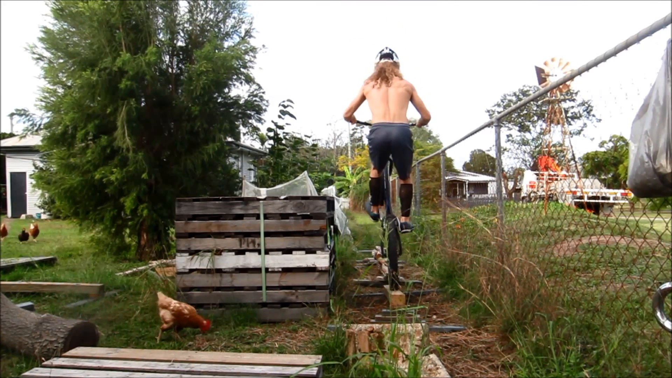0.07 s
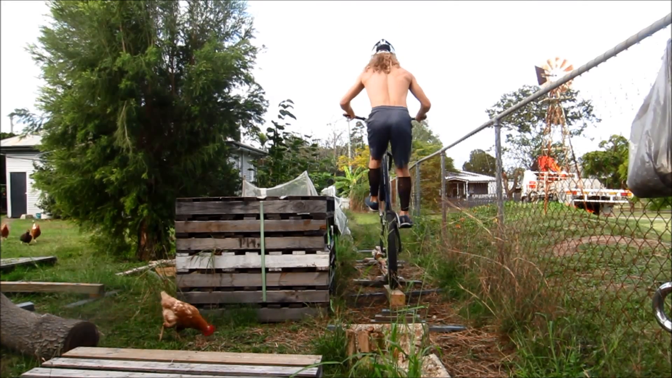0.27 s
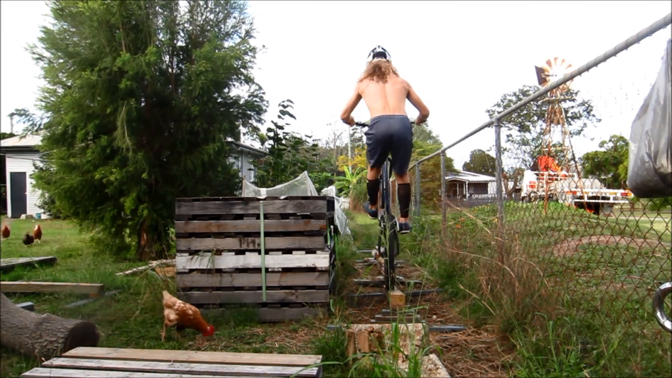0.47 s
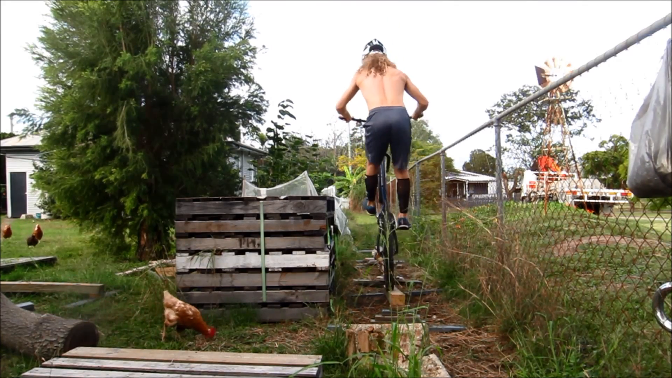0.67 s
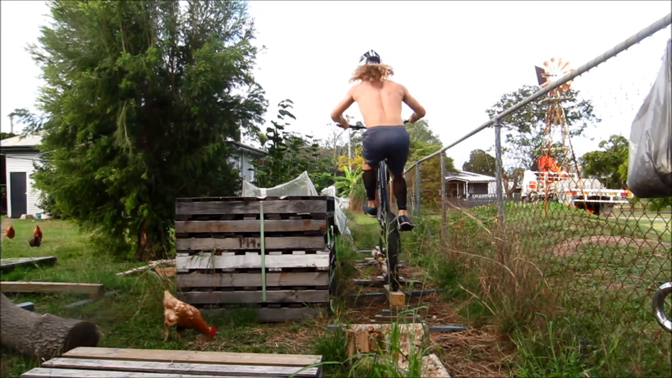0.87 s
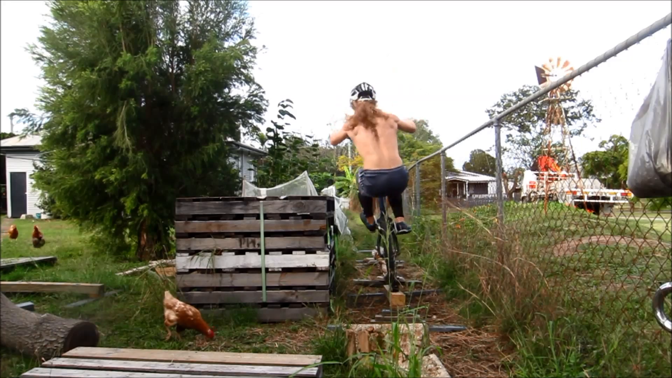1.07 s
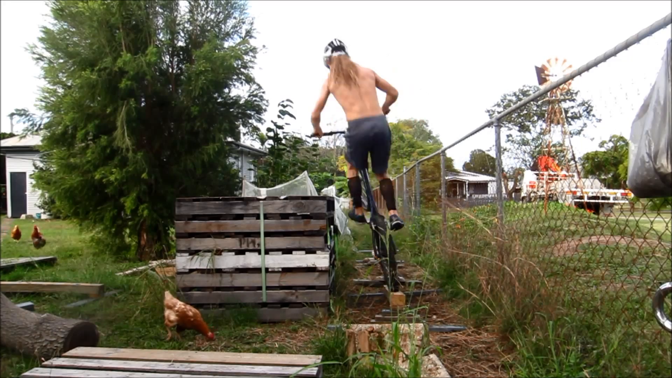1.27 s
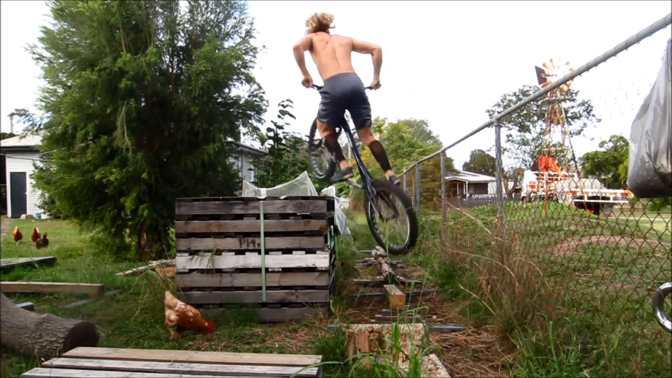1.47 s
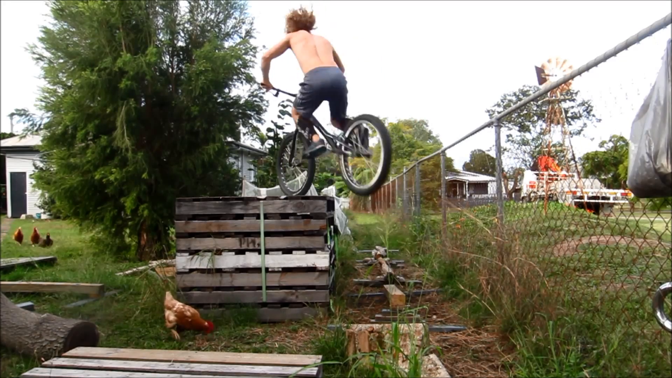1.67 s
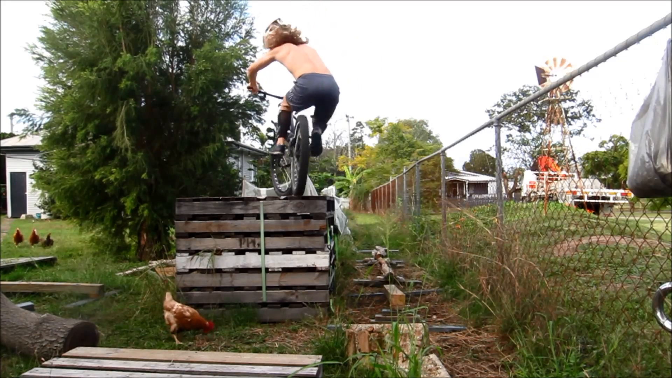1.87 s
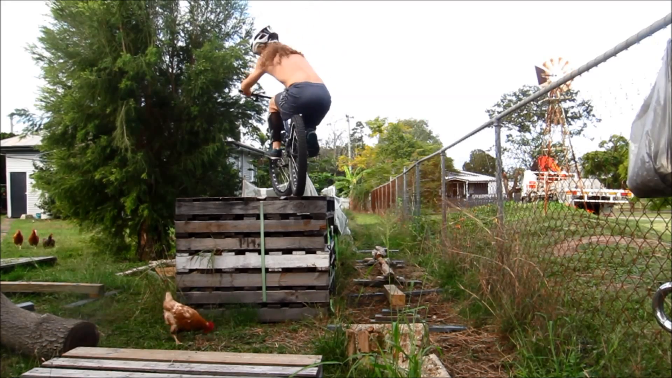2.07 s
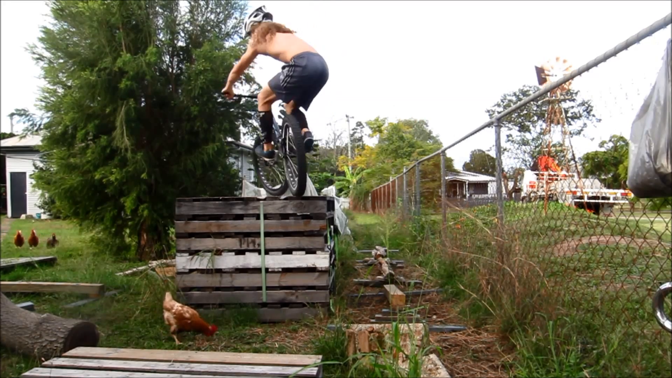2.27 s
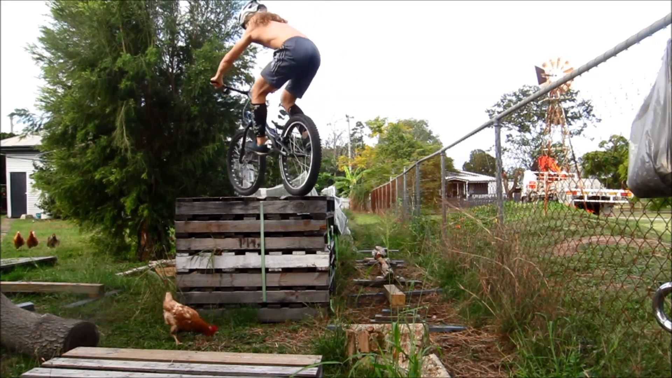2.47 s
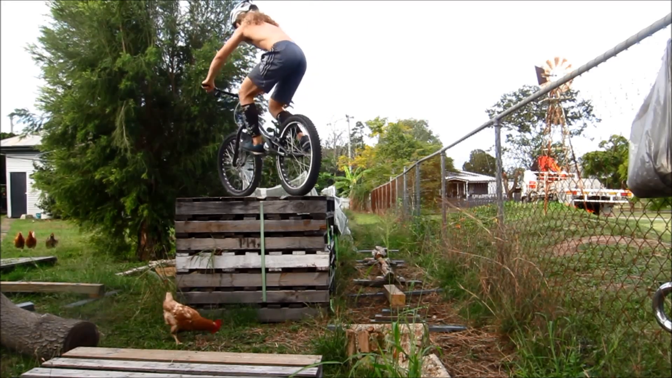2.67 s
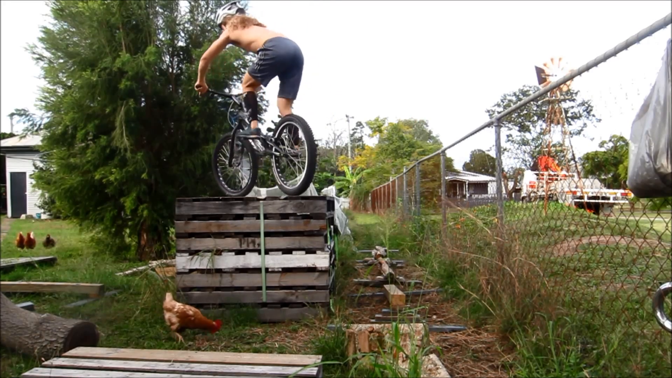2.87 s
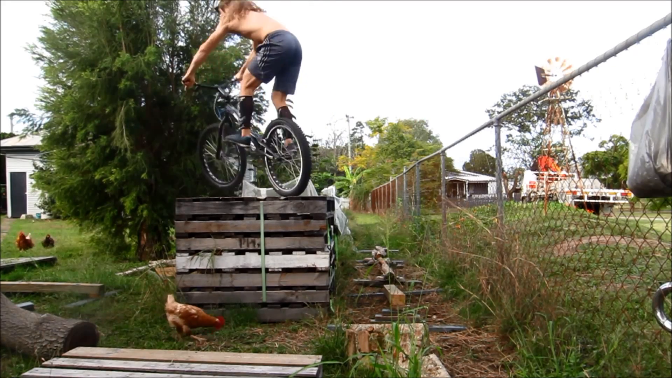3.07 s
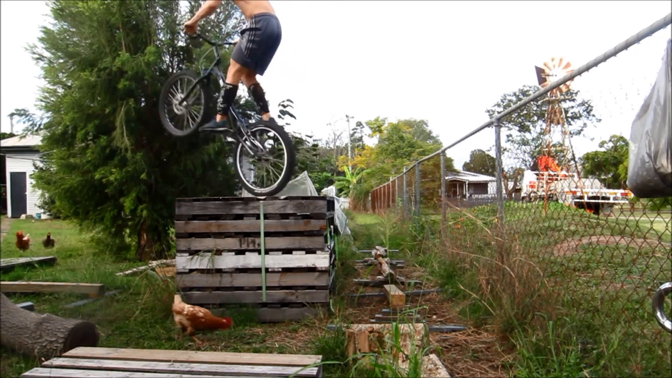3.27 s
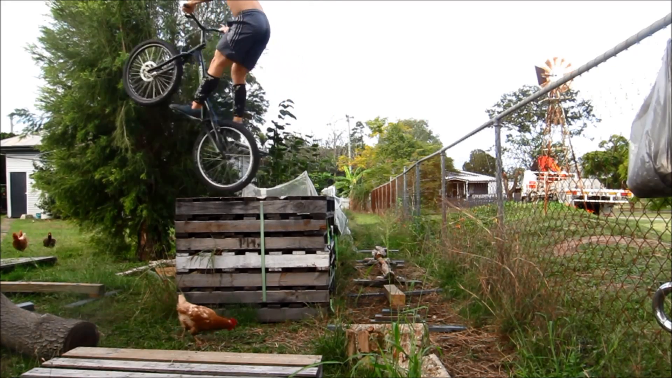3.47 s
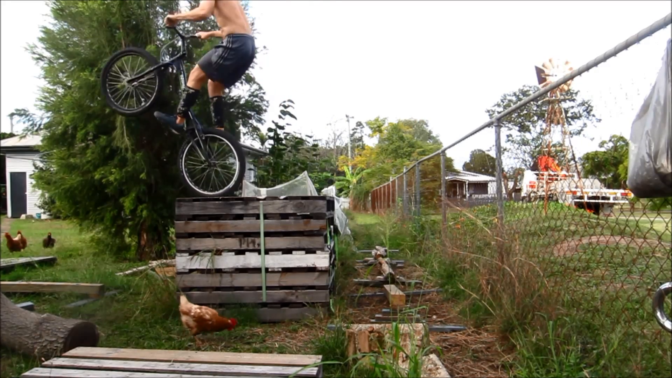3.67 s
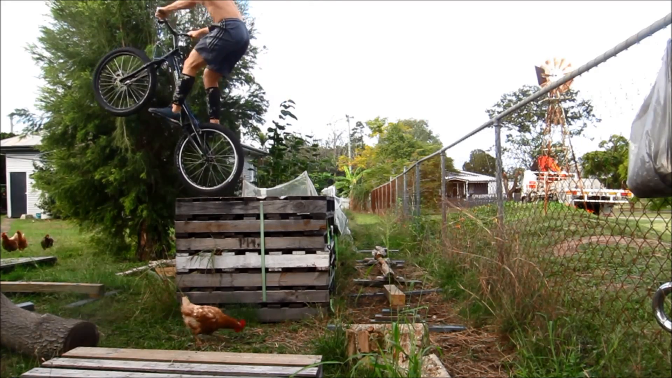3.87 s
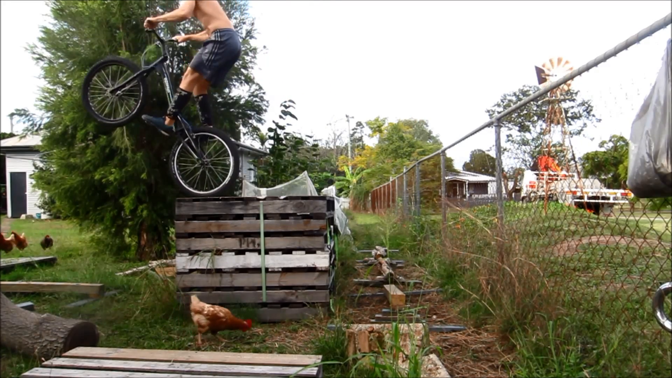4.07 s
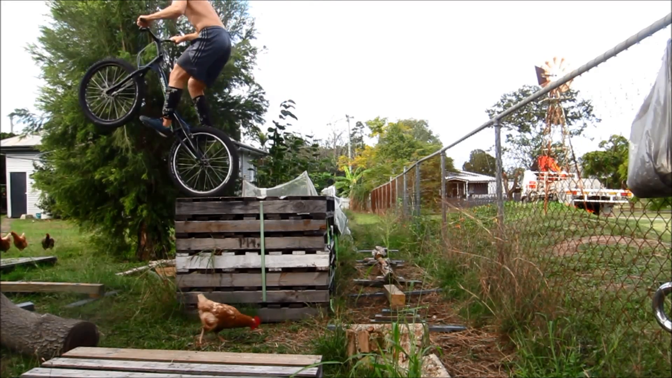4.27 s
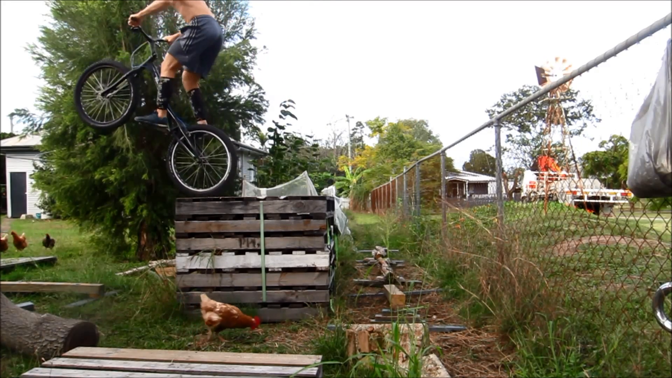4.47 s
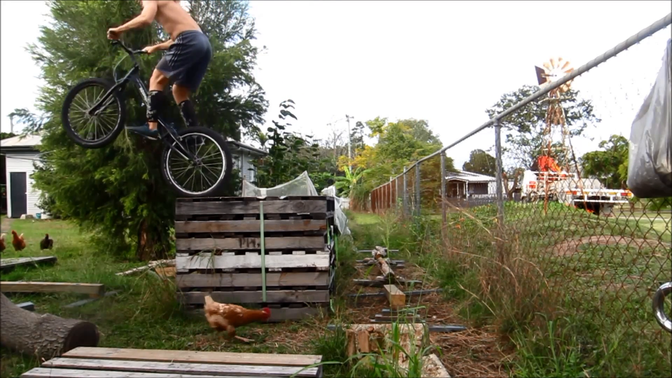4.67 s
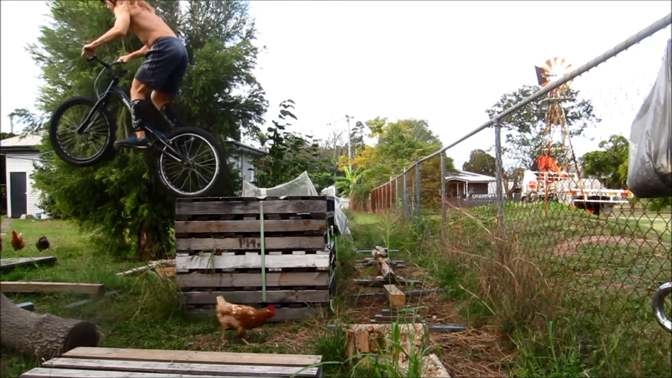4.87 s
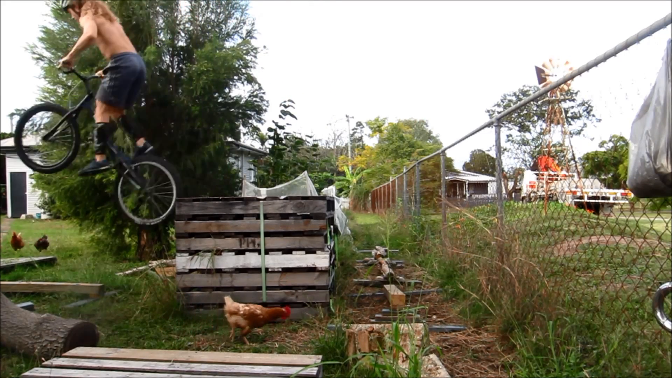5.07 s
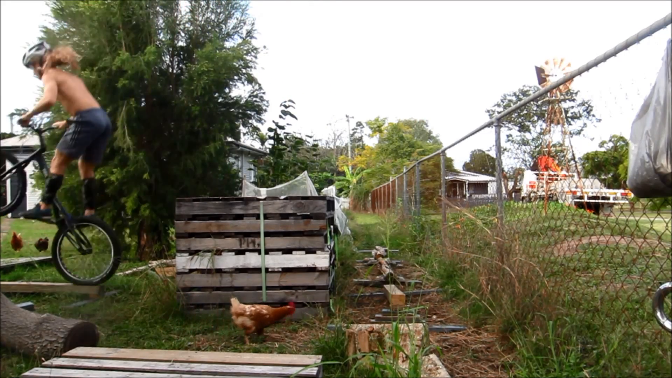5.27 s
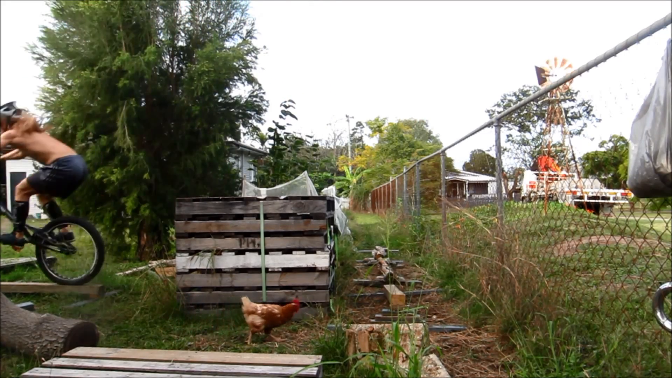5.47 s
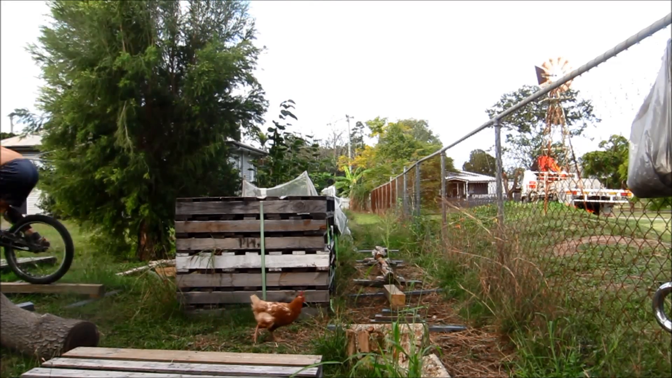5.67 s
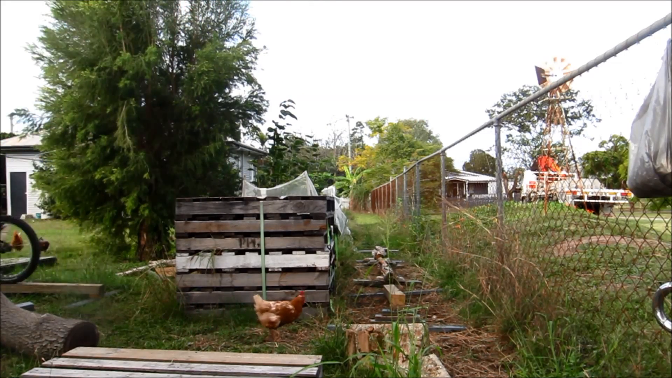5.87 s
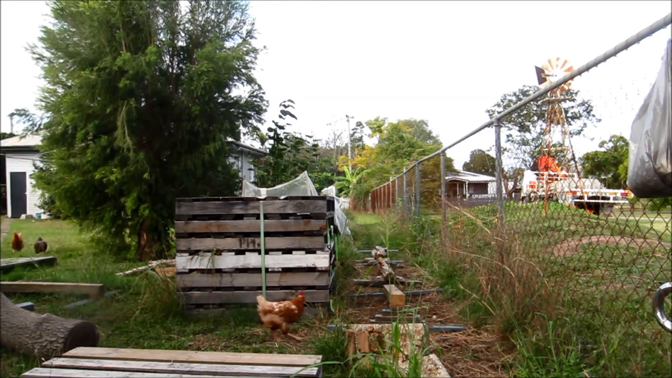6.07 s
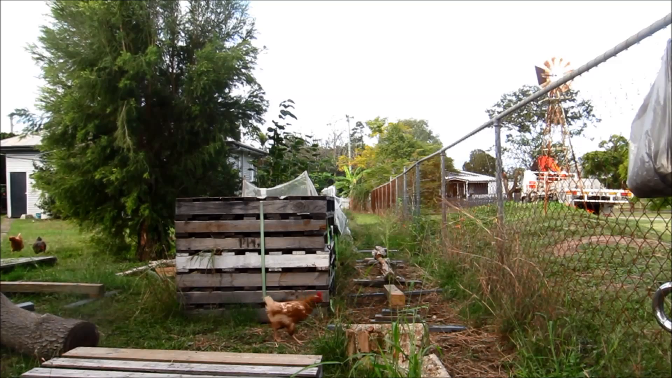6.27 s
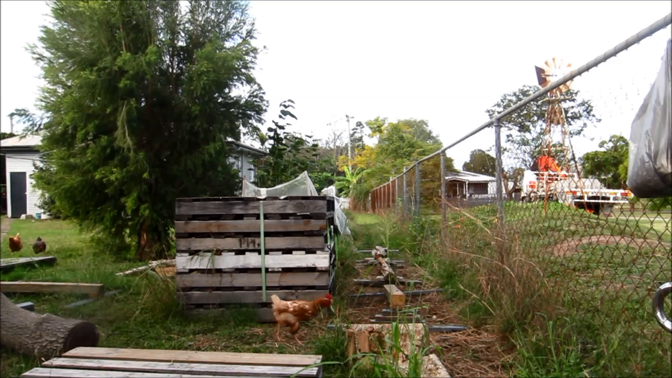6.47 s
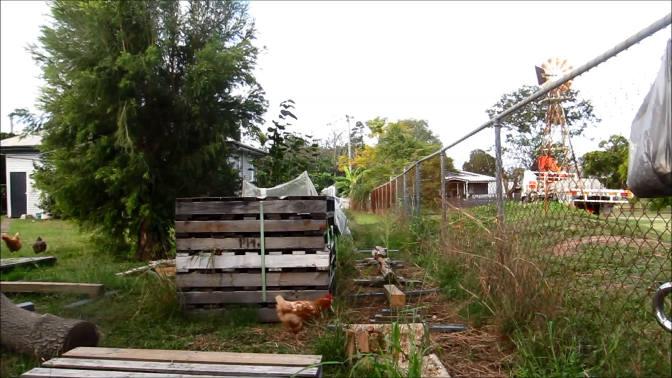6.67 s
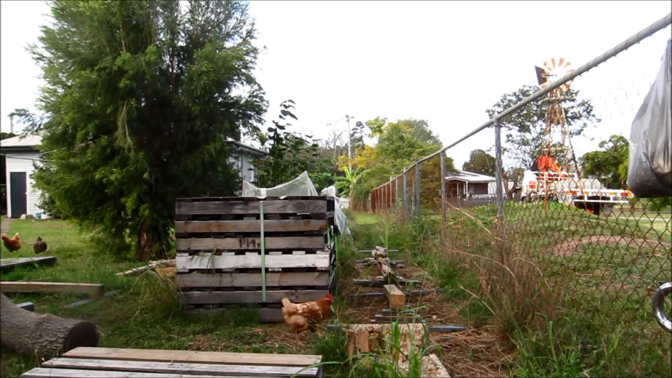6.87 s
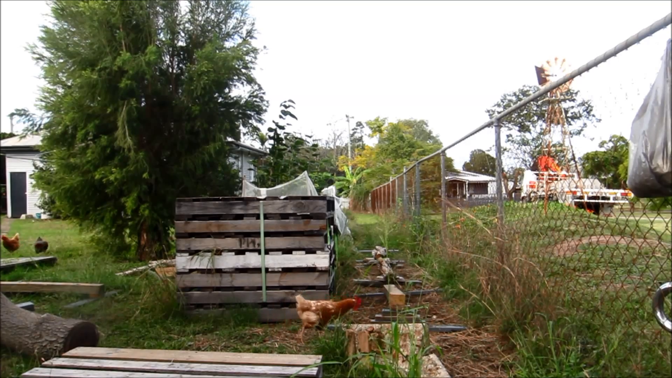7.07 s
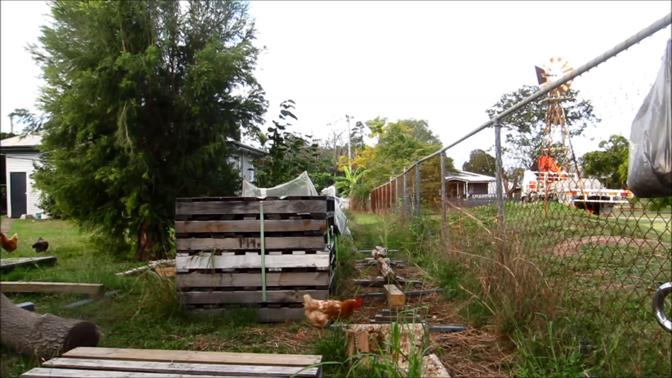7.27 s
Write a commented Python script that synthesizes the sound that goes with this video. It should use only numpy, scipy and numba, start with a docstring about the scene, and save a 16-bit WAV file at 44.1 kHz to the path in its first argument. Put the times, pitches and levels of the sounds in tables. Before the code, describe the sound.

A dry, open-air yard with a low bed of distant traffic, a faint engine drone and a slight breeze. For the first 1.3 s only small metal ticks, light chain chatter and tiny bird chirps are heard. Brakes grab in short raspy grunts at 1.35 and 1.46 s, then a tyre hits the hollow pallet stack at 1.66 s with a strong low wooden boom and slat crack. A brighter chirp comes near 1.86 s and lesser thuds cluster around 1.95 s. More hops thump at 2.6, 2.9 and 3.1 s, with brief freewheel buzzing. A sharp brake squawk at 3.5 s precedes thuds at 3.6, 4.0 and 4.6 s; birds twitter around 4.15 s. At 5.1 s the ratchet whirrs fast, brakes bark at 5.25 s, a thud follows at 5.38 s, and a loud board knock with rattle lands at 5.58 s. The background dips, then soft freewheel clicking and chain rattle trail left until about 7 s.

```python
"""Small metal parts tick over distant traffic before a trials bike hops from a narrow beam onto wooden pallets.
Rim brakes bite by stick-slip, tyre blows excite the modes of the stack, and ratchet pawls buzz in the freewheel.
The bike drops off to the left onto a board, whose damped modes knock; birds chirp in quick pitch glides.
Filtered noise makes the traffic, and a gain control ducks everything after the loudest knocks."""
import sys
import numpy as np
from scipy import signal
from scipy.fft import rfft, irfft
from scipy.io import wavfile
from scipy.ndimage import uniform_filter1d, minimum_filter1d, map_coordinates
from numba import njit

SR = 44100
rng = np.random.default_rng(int(sys.argv[2]) if len(sys.argv) > 2 else 0)


def inscribe(sig):
    """Save sig as 16-bit PCM at rate SR to the path in sys.argv[1].

    A 1-D sig is mono; a 2-D sig holds one channel per row.
    Samples are clipped to [-1, 1] before scaling.
    """
    pcm = np.round(np.clip(np.atleast_2d(sig).T, -1, 1) * 32767)
    wavfile.write(sys.argv[1], SR, pcm.astype(np.int16))


N = 322803
T = np.arange(N) / SR  # time in seconds
TOP_HZ = 15800  # upper edge of the passband

# Damped modes of the wheel rim and spokes.
# Each row: frequency in Hz, relative level in dB, 60 dB decay time in seconds.
RIM_MODES = [(634, 2, 0.13), (900, -16, 0.093), (917, -11.5, 0.26), (1100, -9, 0.34), (1447, 1, 0.24),
             (1790, -1.5, 0.19), (1860, -11, 0.33), (2170, -35, 0.2), (2530, 3.5, 0.061), (2860, -14, 0.26),
             (3540, -36, 0.11), (3610, -2, 0.11), (3980, -13, 0.1), (4540, -12, 0.14), (5740, -27, 0.17),
             (7000, -6, 0.11), (7000, 1, 0.16), (10640, -15, .12)]
# Tyre blows on the pallets.
# Each row: start in seconds, boom level in dB, contact length in seconds, slat crack level in dB.
TYRE_BLOWS = [(1.656, -5, 0.0018, -16.5), (1.6685, -23, 0.0017, -31), (1.953, -16, 0.0017, -22.5),
              (1.969, -21, 0.0034, -36), (1.985, -20, 0.0021, -22), (2.591, -14, 0.0027, -28),
              (2.935, -24, 0.0038, -50), (3.119, -20, 0.0028, -50), (3.591, -18, 0.002, -22),
              (3.9967, -12.5, 0.0024, -24.5), (4.634, -17.5, 0.0034, -30.5), (5.115, -19.5, 0.0037, -46),
              (5.378, -13, 0.0035, -20)]


def amp(db):
    """Level law: decibels to an amplitude ratio."""
    return 10 ** (np.asarray(db) / 20)


def noise():
    """White noise: independent samples of unit power."""
    return rng.standard_normal(N)


def unit(x):
    """Normalisation to unit mean power."""
    return x / np.sqrt(np.mean(x ** 2))


def curve(rows):
    """Linear interpolation in time of every column after the first."""
    s, *columns = np.transpose(rows)
    return [np.interp(T, s, c) for c in columns]


def walk(rate):
    """Smooth random fluctuation: held random steps, averaged twice and scaled to unit power."""
    k = max(int(SR / rate), 2)
    steps = np.repeat(rng.standard_normal(N // k + 1), k)
    smooth = uniform_filter1d(uniform_filter1d(steps, k), k)
    return unit(smooth[:N])


def through(x, response):
    """Linear system: convolution with an impulse response."""
    return signal.oaconvolve(x, response)[:N]


def colour(x, points, size=2048):
    """Minimum-phase filter with a (Hz, dB) shape and unit energy, so white noise keeps its power."""
    hz, db = np.transpose(points)
    grid = np.maximum(np.fft.rfftfreq(size, 1 / SR), 1)
    log_gain = np.log(amp(np.interp(np.log(grid), np.log(hz), db)))
    # folding the cepstrum onto positive times makes the response causal
    cepstrum = irfft(log_gain)
    cepstrum[1:size // 2] *= 2
    cepstrum[size // 2 + 1:] = 0
    response = irfft(np.exp(rfft(cepstrum)))
    return through(x, response / np.linalg.norm(response))


def ring(x, modes):
    """Modal superposition: a force drives a sum of exponentially damped sines."""
    t = T[:SR]
    response = 0
    for hz, db, t60 in modes:
        decay = np.exp(-np.log(1000) * t / t60)
        response = response + amp(db) * np.sin(2 * np.pi * hz * t) * decay
    return through(x, response)


def swell(t, rise, decay):
    """Envelope with a Gaussian rise to 1 at t = 0 and an exponential decay."""
    return np.exp(-(np.minimum(t, 0) / rise) ** 2 - np.maximum(t, 0) / decay)


def burst(s, rise, decay):
    """Transient envelope that peaks at time s."""
    out = np.zeros(N)
    near = slice(max(int((s - .05) * SR), 0), int((s + .25) * SR))
    out[near] = swell(T[near] - s, rise, decay)
    return out


def push(s, length):
    """Contact force: a half-sine of unit area, whose bandwidth falls as the contact lengthens."""
    force = np.sin(np.pi * np.clip((T - s) / length, 0, 1))
    return force / force.sum()


def pallets(crack_decay=0.0039, rattle_db=-16, rattle_decay=0.051, snap=2.2, rumble_db=-21,
            clatter_db=-42, jostle_decay=0.027, low_hz=110, rebound_s=.023, rebound_db=-13.5):
    """Impact excitation of modes: tyre blows boom in the stack, slats crack and loose layers jostle."""
    # Main booms of the stack.
    # Each row: frequency in Hz, relative level in dB, 60 dB decay time in seconds.
    stack_modes = [(217, -2, .10), (244, -13, .09), (368, -7, .11)]
    # Single slats and bearers, with the same columns.
    slat_modes = [(97, -17, .13), (290, -25, 0.066), (464, -50, .06), (593, -14, 0.19), (760, -37, .06),
                  (1050, -36, .05)]
    # Spectrum of a slat crack. Each row: frequency in Hz, relative level in dB.
    crack_shape = [(100, -11), (400, -1), (1300, -1.5), (2200, -3.5), (3300, -7), (5500, -17.5),
                   (9000, -48), (16000, -29)]
    layer_shape = [(50, -16), (160, -9.5), (260, -2), (340, -9.5), (500, -12.0), (1000, -19), (4000, -82)]

    # a slat springs back and strikes its bearer again
    rebounds = [(s + rebound_s, boom_db + rebound_db, length, crack_db + rebound_db)
                for s, boom_db, length, crack_db in TYRE_BLOWS]
    force, slats, snaps, jostle = 0, 0, 0, 0
    for s, boom_db, length, crack_db in TYRE_BLOWS + rebounds:
        force = force + amp(boom_db) * push(s, length)
        jostle = jostle + amp(boom_db) * burst(s + length, length, jostle_decay)
        crack = burst(s, 0.00016, crack_decay)
        rattle = amp(rattle_db) * burst(s, 0.00099, rattle_decay)
        slats = slats + amp(crack_db) * (crack + rattle)
        snaps = snaps + amp(crack_db) * snap * push(s, .0001)
    layers = colour(amp(rumble_db) * jostle * noise(), layer_shape)
    clatter = amp(clatter_db) * jostle * noise()
    boom = ring(force + clatter, stack_modes + slat_modes) + layers
    # the open stack radiates little deep bass
    boom = signal.sosfilt(signal.butter(2, low_hz, "high", fs=SR, output="sos"), boom)
    return boom + colour(slats * noise() + 2 * snaps, crack_shape)


def board(contact_s=0.00036, low_hz=400, high_hz=1800):
    """Modal impact: the back wheel slaps a board onto the soil, then the bike's weight rattles on it."""
    # Blows of the landing. Each row: start of the knock and peak of the rattle in seconds,
    # knock level in dB, rattle level in dB, rattle rise in seconds, rattle decay in seconds.
    landing = [(5.5805, -21, -29, .0005, 0.0037), (5.5893, 4, -22, 0.0014, 0.0033),
               (5.6040, -12, -36, .002, 0.012), (5.6130, -22, -8.5, 0.0064, 0.014)]
    # Modes of the board.
    # Each row: frequency in Hz, relative level in dB, 60 dB decay time in seconds.
    board_modes = [(276, -19, 0.088), (530, -13.5, 0.059), (730, -13, 0.037), (857, -3.5, 0.038),
                   (1135, -2, 0.018), (1320, -1.5, 0.023), (1810, -3, 0.018)]
    rattle_shape = [(100, -32), (250, -1.5), (500, -13), (1000, -1.5), (2300, -13.0), (3300, -6.5),
                    (4500, -18.0), (7000, -8.5), (16000, -28)]

    force = sum(amp(knock_db) * push(s, contact_s) for s, knock_db, _, _, _ in landing)
    rattle = sum(amp(db) * burst(s, rise, decay) for s, _, db, rise, decay in landing)
    # a narrow board radiates little bass, and the soft tyre takes off the treble
    band = signal.butter(3, [low_hz, high_hz], "band", fs=SR, output="sos")
    knock = signal.sosfilt(band, ring(force, board_modes))
    return knock + colour(rattle * noise(), rattle_shape)


def brakes(wander=.048, slip_share=0.75, rim_db=-46, spread_hz=1400):
    """Stick-slip friction: a sawtooth force with grit at each slip and a thin hiss; the wheel rings on."""
    # Pads grabbing or dragging on the rim. Each row: peak time in seconds, rise in seconds,
    # decay in seconds, mean judder rate in Hz, then judder, grit and high hiss levels in dB.
    bites = [(1.343, 0.0077, 0.0049, 921, -13.5, -15.5, -30),
             (1.355, 0.0056, 0.0065, 890, -16.5, -16.5, -31), (1.452, 0.00174, .0078, 820, -23, -20.5, -36),
             (1.464, 0.0038, 0.0046, 835, -10, -22, -33), (1.491, 0.002, 0.012, 840, -29, -28, -45),
             (1.59, .07, 0.038, 851, -42, -71, -70), (3.511, 0.0041, 0.0047, 890, -2, -8, -10.5),
             (5.243, 0.0048, 0.019, 805, -11.5, -5, -6.5), (5.25, 0.0015, 0.003, 814, -2, -1, -9),
             (5.257, 0.0013, 0.0043, 820, -6, -15, -25)]
    # Spectrum of the grit. Each row: frequency in Hz, relative level in dB.
    grit_shape = [(150, -30), (450, -11), (800, 1), (1800, -0.5), (3000, 3.5), (4400, -3.5), (6000, 1),
                  (8000, -7), (10500, -5), (16000, -29)]
    # Spectrum of the hiss, with the same columns.
    hiss_shape = [(3000, -32), (7500, -12), (10300, 7), (12500, -0.5), (16000, -24)]
    # Faint, slowly decaying pair of rim modes that beat together.
    # Each row: frequency in Hz, relative level in dB, 60 dB decay time in seconds.
    beating_pair = [(836, -21, 1.0), (864, -20, .7)]

    judder, grit, hiss = 0, 0, 0
    waver = 1 + wander * walk(450)
    for s, rise, decay, hz, judder_db, grit_db, hiss_db in bites:
        cycle = np.cumsum(hz * waver / SR) % 1
        grip = burst(s, rise, decay)
        judder = judder + amp(judder_db) * grip * unit(cycle - .5)
        grit = grit + amp(grit_db) * grip * unit(.5 + np.exp(-cycle / slip_share))
        hiss = hiss + amp(hiss_db) * grip
    band = signal.butter(2, [520, 5000], "band", fs=SR, output="sos")
    judder = signal.sosfilt(band, judder)
    # bending waves travel at different speeds: an allpass smears the edge of each slip
    _, poles = signal.iirpeak(spread_hz, 2, fs=SR)
    bite = signal.lfilter(poles[::-1], poles, judder) + colour(grit * noise(), grit_shape)
    after_ring = amp(rim_db) * ring(bite, RIM_MODES + beating_pair)
    return bite + after_ring + colour(hiss * noise(), hiss_shape)


def freewheel(scatter_db=2.2, click_decay=.0032, tail_db=-12, tail_decay=0.0046):
    """Ratchet impacts: pawl drops add in power, so a faster spin is louder; clicks die away in the spokes."""
    # Spins of the freewheel. Each row: start in seconds, end in seconds, pawl clicks per second
    # at the start, in the middle and at the end, click level in dB, swell time in seconds.
    spins = [(2.833, 2.995, 60, 132, 80, -23, 0.0088), (3.366, 3.502, 73, 205, 210, -24, 0.011),
             (5.094, 5.236, 250, 380, 450, -22.5, 0.017), (5.648, 5.829, 95, 110, 68, -26, 0.011),
             (5.992, 6.349, 100, 160, 160, -28.5, 0.0073), (6.487, 6.839, 122, 142, 116, -31, 0.0083),
             (6.845, 7.017, 67, 53, 56, -31.5, .004)]
    # Spectrum of the clicks. Each row: frequency in Hz, relative level in dB.
    pawl_shape = [(300, -29), (1000, -9), (2000, 1), (3300, 2.5), (4200, 6), (5400, 6.5), (6800, -0.5),
                  (8500, -2), (10300, 2), (12500, -3), (16000, -7)]

    shake = np.zeros(N)
    for start, end, first, middle, last, db, swell_s in spins:
        times = [start, (start + end) / 2, end]
        rate = np.interp(T, times, [first, middle, last], left=0, right=0)
        drops = np.diff(np.ceil(np.cumsum(rate) / SR), prepend=0)
        onset = 1 - np.exp(-np.maximum(T - start, 0) / swell_s)
        shake += drops * amp(db) * onset
    shake *= amp(scatter_db * noise())
    t = T[:SR // 10]
    click = np.exp(-t / click_decay) + amp(tail_db) * np.exp(-t / tail_decay)
    click *= 1 - np.exp(-t / 0.0012)
    envelope = np.sqrt(np.abs(through(shake ** 2, click ** 2)))
    return colour(envelope * noise(), pawl_shape)


def ticks(body_db=-3, edge_db=-3, rim_db=-52, rise=0.0021, decay=0.006, bounce_s=0.0168, bounce_db=-12,
          jolt_lag_s=.007, jolt_db=-2.5, jolt_treble_db=-13):
    """Micro-impacts: metal parts shift under load or after a tyre blow, each with a spray and one bounce."""
    # Chain, pedals and frame, and the first pawl drops of the spins at 2.83 s and 3.37 s. Each row: start in
    # seconds, level in dB, treble against middle in dB.
    contacts = [(.0074, -22, -11), (0.0548, -24, -19), (0.4236, -30.5, -3), (.439, -33, -14),
                (0.471, -25, -11), (.5353, -34.5, -11), (0.586, -34.5, -18), (0.955, -24, -9),
                (1.007, -17.5, -12.5), (1.27, -21, -20), (1.3005, -25.5, -8), (1.5364, -22, -12),
                (1.6162, -27, -43), (1.7457, -29, -30), (1.7784, -25.5, -6), (1.8623, -26.5, -5),
                (1.876, -26, -4), (2.2583, -30.5, -17), (2.2698, -36.5, 4), (2.316, -26, -3.5),
                (2.5555, -26.5, -3.5), (2.6342, -26, -0.5), (2.661, -41, -8), (2.8315, -34.5, 4),
                (3.1199, -25, -12), (3.3668, -20, -4), (3.7134, -25, -4), (4.5944, -33, 3.5),
                (4.6032, -31, 1.5), (4.9005, -24, -28), (6.4377, -32.5, -7)]
    # Spectrum of the middle. Each row: frequency in Hz, relative level in dB.
    body_shape = [(200, -14.5), (900, 1.5), (2200, 4), (3500, 5), (4300, 1.5), (5600, 5), (7500, -6.5),
                  (10000, -8), (16000, -23)]
    # Spectrum of the treble, with the same columns.
    edge_shape = [(1000, -40), (6000, 2), (10000, 8), (12500, 5), (16000, -13.5)]
    # Hard little clacks of the frame. Each row: peak time in seconds, level in dB, decay in seconds.
    clacks = [(1.272, -29, 0.0056), (2.775, -29.5, 0.0055), (3.016, -24, 0.012), (3.059, -29, 0.012),
              (6.310, -36, 0.016), (6.709, -44, .012)]
    # Spectrum of the clacks. Each row: frequency in Hz, relative level in dB.
    clack_shape = [(300, -17), (1300, -4), (2000, 10), (2900, -7.5), (5000, -3), (8000, -16), (16000, -28)]

    # a tick follows each tyre blow, its level set by the slat's crack
    jolted = [(s + jolt_lag_s, crack_db + jolt_db, jolt_treble_db) for s, _, _, crack_db in TYRE_BLOWS]
    body, edge = 0, 0
    for s, db, treble_db in contacts + jolted:
        peak = s + rise / 2
        bounce = amp(bounce_db) * burst(peak + bounce_s, rise, decay)
        contact = amp(db) * (burst(peak, rise, decay) + bounce)
        body = body + contact
        edge = edge + amp(treble_db) * contact
    spray = unit(noise() * amp(3.8 * walk(1500)))
    metal = amp(body_db) * colour(body * spray, body_shape)
    metal += amp(edge_db) * colour(edge * noise(), edge_shape)
    knocks = sum(amp(db) * burst(s, 0.0002, clack_decay) for s, db, clack_decay in clacks)
    metal += colour(knocks * noise(), clack_shape)
    return metal + amp(rim_db) * ring(metal, RIM_MODES)


def chain(jolts, grain_db=4, flutter_db=4.0, settle_s=0.045, shake_db=-15):
    """Energy storage: links and cables chatter with the smoothed power of the jolts, and in flurries."""
    # Flurries as the rider shifts or rolls over grass.
    # Each row: peak time in seconds, rise in seconds, decay in seconds, level in dB.
    bustle = [(.13, 0.022, 0.05, -45.5), (1.12, 0.13, 0.076, -41.5), (2.03, .025, 0.28, -48),
              (2.772, 0.027, 0.024, -33.5), (4.17, 0.15, 0.053, -43), (5.385, 0.016, 0.12, -32),
              (6.08, 0.095, 0.24, -36.5), (6.72, 0.037, .08, -34.5)]
    chatter_shape = [(400, -16), (1500, -2.5), (3400, 4.0), (6000, -1), (8000, -9.5), (11000, -4.5),
                     (16000, -21)]

    keep = np.exp(-1 / (settle_s * SR))
    shaken = amp(shake_db) * np.sqrt(signal.lfilter([1 - keep], [1, -keep], jolts ** 2))
    flurries = sum(amp(db) * swell(T - s, rise, decay) for s, rise, decay, db in bustle)
    grains = unit(noise() * amp(grain_db * walk(900) + flutter_db * walk(70)))
    return colour(grains * np.hypot(shaken, flurries), chatter_shape)


def birds(quaver=.045, flutter_db=4, octave_db=-16):
    """Frequency glides: thin calls unsteady in pitch and strength; the lower ones carry a faint octave."""
    # Strokes of the calls. Each row: start in seconds, length in seconds,
    # first and last pitch in Hz before the quaver, level in dB.
    calls = [(0.203, 0.019, 9140, 15000, -38), (1.049, 0.011, 3470, 5100, -40),
             (1.106, 0.022, 4920, 6040, -34.5), (1.864, 0.014, 6500, 4020, -20.5),
             (2.075, 0.037, 4000, 6250, -48), (2.194, 0.026, 5600, 3760, -38),
             (2.37, .034, 13500, 8600, -44.5), (2.428, 0.064, 11800, 7400, -45.5),
             (4.134, .018, 5360, 3500, -45.5), (4.144, 0.021, 4030, 5700, -33.5),
             (4.165, 0.029, 4920, 3760, -34), (4.188, .022, 3920, 2190, -36.5),
             (4.362, 0.021, 4420, 4930, -47), (4.447, 0.017, 3720, 4160, -46)]

    out = np.zeros(N)
    waver = 1 + quaver * walk(700)
    for s, length, first_hz, last_hz, db in calls:
        near = (T > s) & (T < s + length)
        along = (T[near] - s) / length
        hz = first_hz * (last_hz / first_hz) ** along * waver[near]
        phase = 2 * np.pi * np.cumsum(hz) / SR
        octave = amp(octave_db) * (2 * hz < TOP_HZ) * np.sin(2 * phase)
        out[near] += amp(db) * np.sqrt(np.sin(np.pi * along)) * (np.sin(phase) + octave)
    return out * unit(amp(flutter_db * walk(230)))


def yard(traffic_db=-37, drone_hz=77, drone_width_hz=9, breeze_db=-55):
    """Random noise fields: traffic swells gently, an engine drones as a widened tone, a breeze brushes by."""
    # Spectrum of distant traffic and leaves. Each row: frequency in Hz, relative level in dB.
    far_shape = [(20, -9.5), (45, -2.5), (100, 2), (140, -6.5), (195, -2.5), (300, -10.5), (550, -8),
                 (1000, -2.5), (1500, -8.5), (2200, -14.5), (4000, -30), (7000, -38), (12000, -41.5),
                 (16000, -46)]
    # Course of the far drone. Each row: time in seconds, level in dB.
    drone_course = [(0, -43.5), (2.6, -47.5), (3.9, -44.5), (4.6, -40), (5.15, -40), (5.5, -49),
                    (6.3, -41.5), (7.1, -41)]
    breeze_shape = [(15, -5), (40, -8), (120, -3), (600, -29), (4000, -90)]

    traffic = amp(traffic_db + 0.1 * walk(0.34) + .5 * walk(8))
    mid, side = (colour(noise(), far_shape, size=8192) * traffic for _ in range(2))
    phase = 2 * np.pi * drone_hz * T
    # random amplitude and phase widen the tone into a band
    drone = unit((1 + .5 * walk(2 * drone_width_hz)) * np.sin(phase + walk(drone_width_hz)))
    drone = amp(curve(drone_course)[0]) * drone
    breeze = np.array([colour(noise(), breeze_shape, size=8192) for _ in range(2)])
    gusts = amp(breeze_db + 2 * walk(3.05))
    return diffuse(mid, side) + drone + gusts * breeze


def ports(x, lead):
    """Interaural-style time difference: of two close ports, the left hears a left source first."""
    return np.array([map_coordinates(x, [np.arange(N) + side * lead / 2], order=3) for side in (1, -1)])


def diffuse(mid, side, corner_hz=2000):
    """Diffuse-field coherence: alike at both ports in the bass, less so in the treble."""
    side = signal.sosfilt(signal.butter(1, corner_hz, "high", fs=SR, output="sos"), side)
    return np.array([mid + side, mid - side])


def glances(x, db=-10, sway_s=0.000616, count=3):
    """Early reflection: bounces off ground and boards, on delays that drift as the bike moves."""
    def bounces():
        """Superposition of a few copies, each on its own drifting delay."""
        delays = [rng.uniform(.002, .009) + sway_s * walk(2) for _ in range(count)]
        copies = sum(map_coordinates(x, [np.arange(N) - d * SR], order=2) for d in delays)
        return copies / np.sqrt(count)
    return amp(db) * diffuse(bounces(), bounces(), corner_hz=900)


def echoes(x, db, t60, damp_hz):
    """Scattering: thin open-air reverberation as decaying noise, different at each port."""
    t = T[:SR // 2]
    shape = (1 - np.exp(-t / 0.0004)) * np.exp(-np.log(1000) * t / t60)
    scatter = rng.standard_normal((2, len(t))) * shape / np.linalg.norm(shape)
    dull = signal.butter(1, damp_hz, fs=SR, output="sos")
    mid, side = (through(x, response) for response in signal.sosfilt(dull, scatter))
    return amp(db) * diffuse(mid, side)


def scene(tyre_cushion_db=-3.5):
    """Superposition of direct sound, reflections and background as the bike moves left across the yard."""
    # The bike's way to the left. Each row: time in seconds, lead of the left port in samples.
    bearing = [(0, -.6), (1.4, -.3), (2.9, .6), (3.5, 1.25), (5.24, 2.15), (5.6, 2.8), (6.3, 3.6),
               (7.3, 4.2)]

    metal = brakes() + ticks() + freewheel()
    wood = pallets() + board()
    song = birds()
    metal = metal + chain(metal + amp(tyre_cushion_db) * wood)
    direct = ports(metal + wood, curve(bearing)[0]) + ports(song, lead=0.49)
    fence = echoes(metal + wood, db=-19, t60=.2, damp_hz=8000)
    trees = echoes(song, db=-1.5, t60=0.2, damp_hz=9000)
    return direct + glances(metal) + fence + trees + yard()


@njit
def hold(excess, release):
    """Peak follower: rises at once and decays exponentially."""
    out, held = np.empty(len(excess)), 0.
    for i in range(len(excess)):
        held = max(excess[i], held * release)
        out[i] = held
    return out


def record(dry, threshold_db=-13.0, attack_s=0.0059, hold_s=0.25, release_s=0.37,
           notch_hz=8250, notch_q=6.8):
    """Gain control: a treble notch, gain held down after loud knocks, clipping and a steep top cut."""
    x = signal.lfilter(*signal.iirnotch(notch_hz, notch_q, fs=SR), dry)
    x = signal.lfilter(*signal.iirnotch(notch_hz, 3 * notch_q, fs=SR), x)
    keep = np.exp(-1 / (attack_s * SR))
    power = signal.lfilter([1 - keep], [1, -keep], np.mean(x ** 2, axis=0))
    # the greatest power within the past hold time
    half = int(hold_s * SR / 2)
    recent = -minimum_filter1d(-power, size=2 * half + 1, origin=half)
    excess_db = 10 * np.log10(recent + 1e-12) - threshold_db
    cut_db = hold(excess_db, np.exp(-1 / (release_s * SR)))
    top_cut = signal.ellip(8, .2, 70, TOP_HZ, fs=SR, output="sos")
    return signal.sosfilt(top_cut, np.clip(x * amp(-cut_db), -1, 1))


dry = scene()
out = record(dry)
inscribe(out)
```